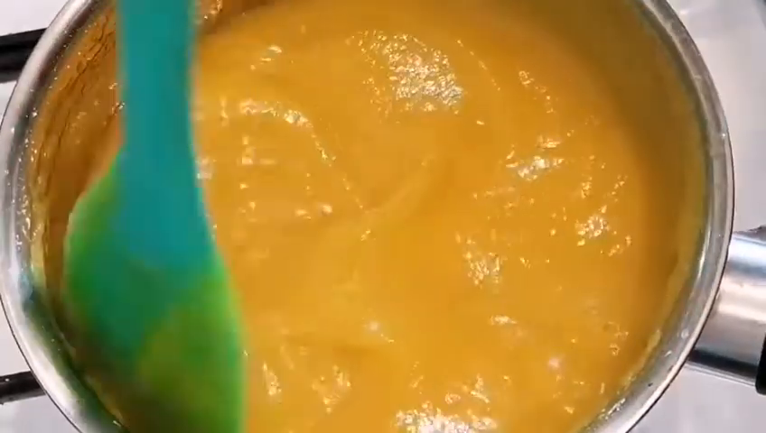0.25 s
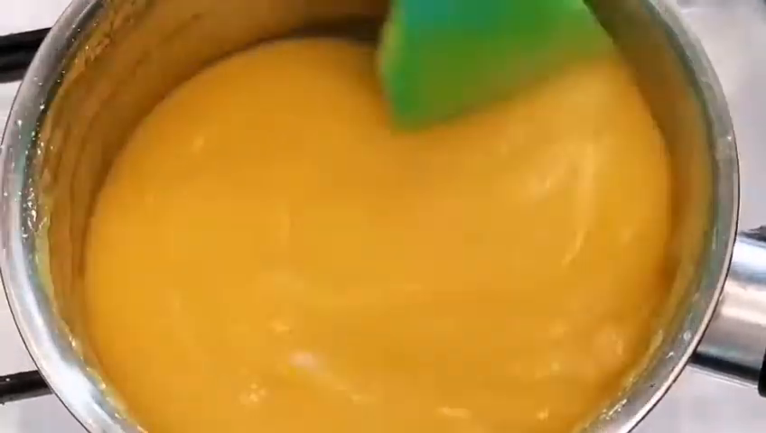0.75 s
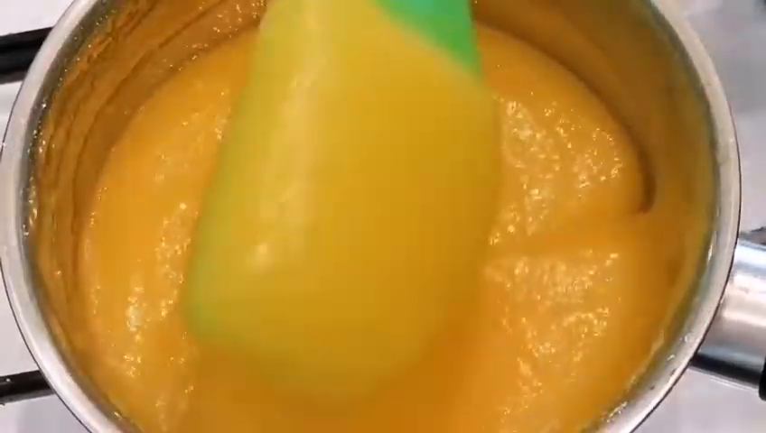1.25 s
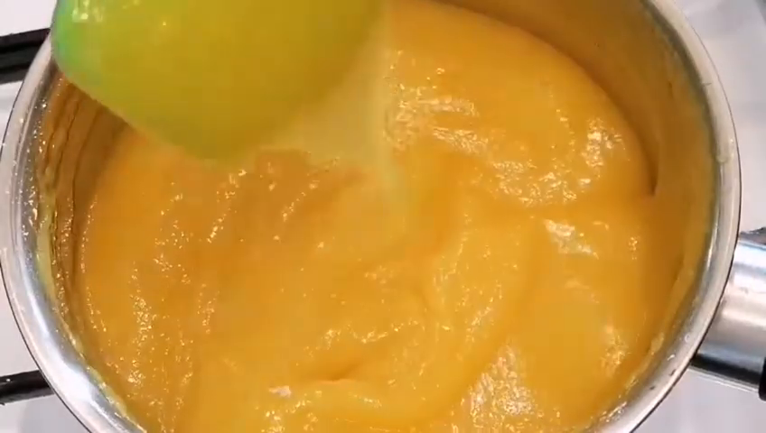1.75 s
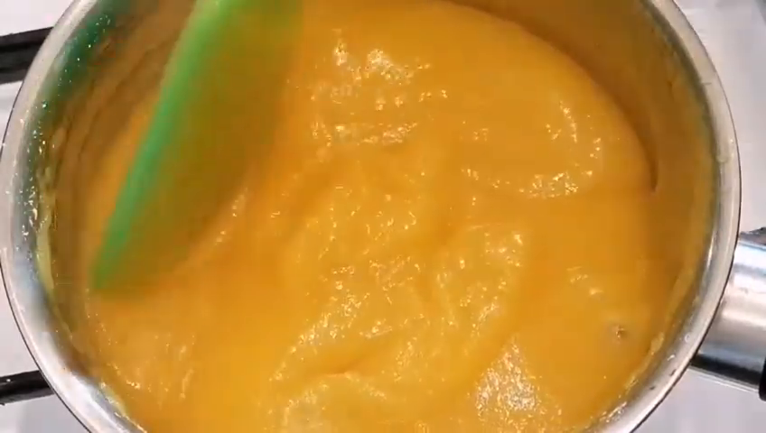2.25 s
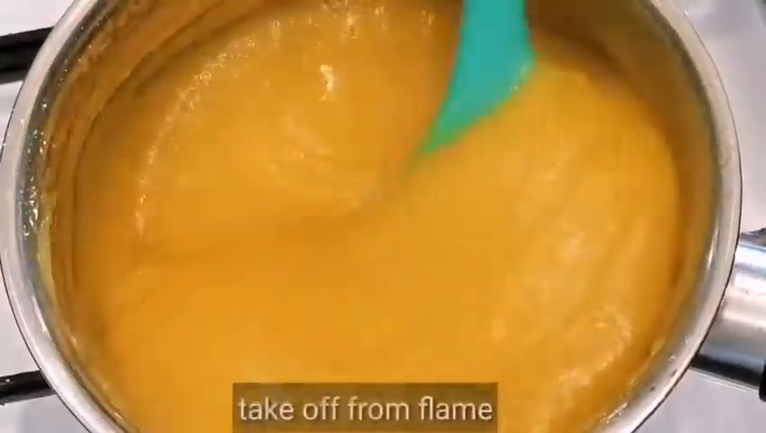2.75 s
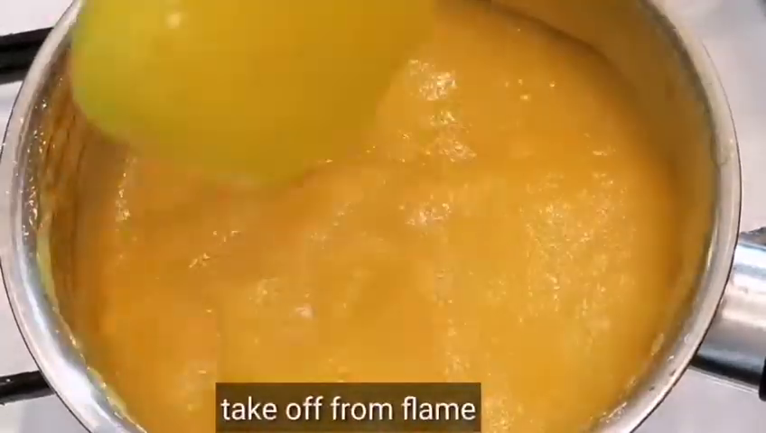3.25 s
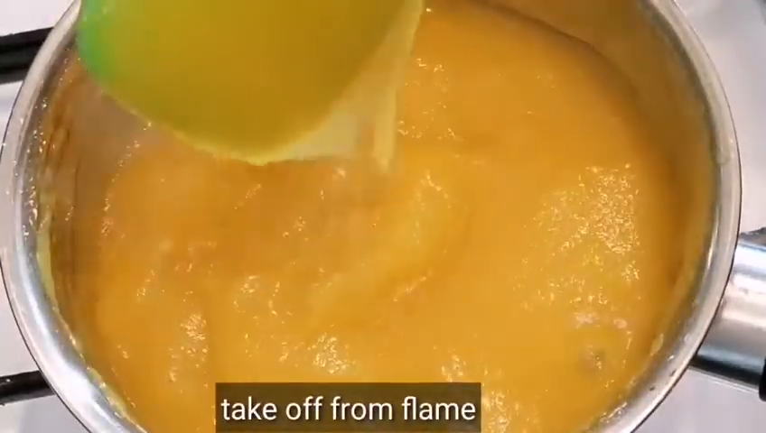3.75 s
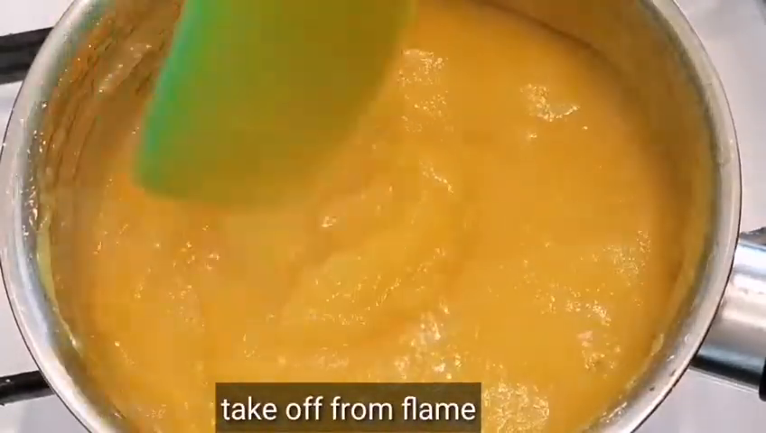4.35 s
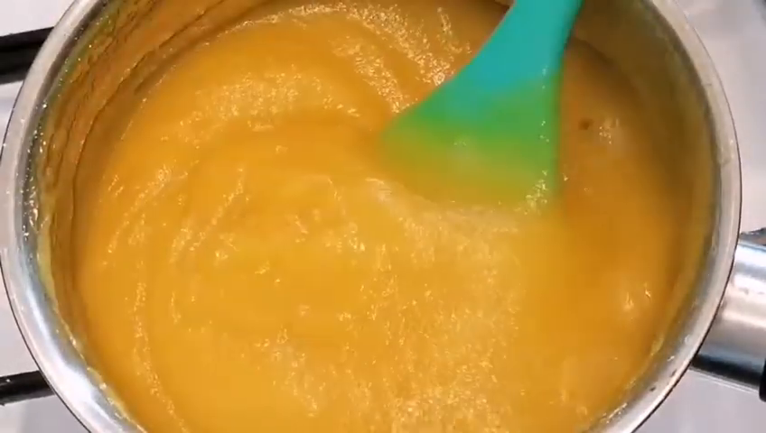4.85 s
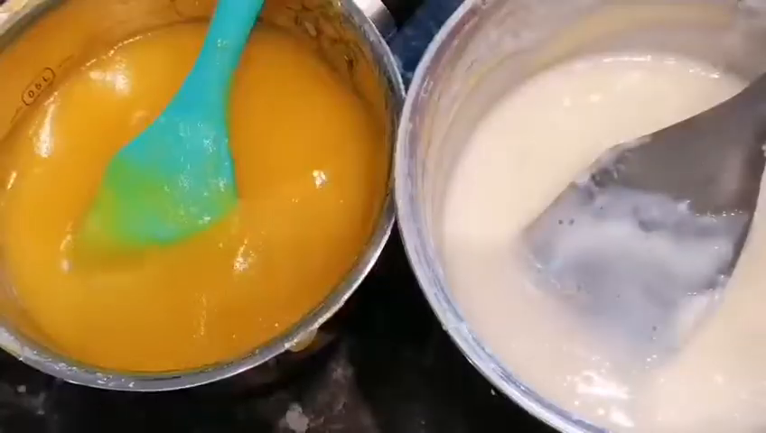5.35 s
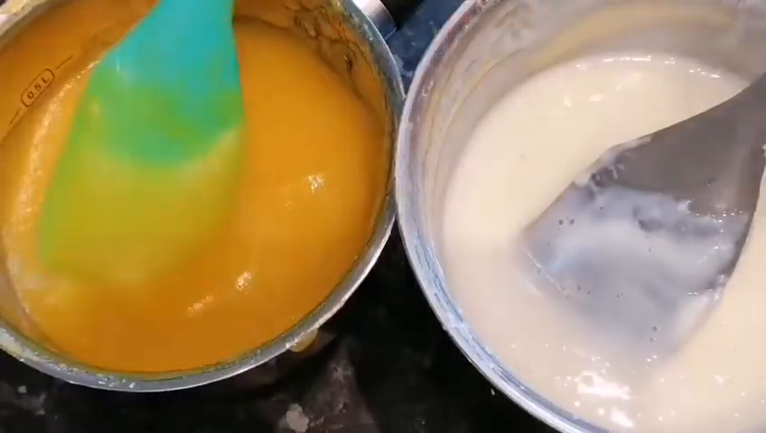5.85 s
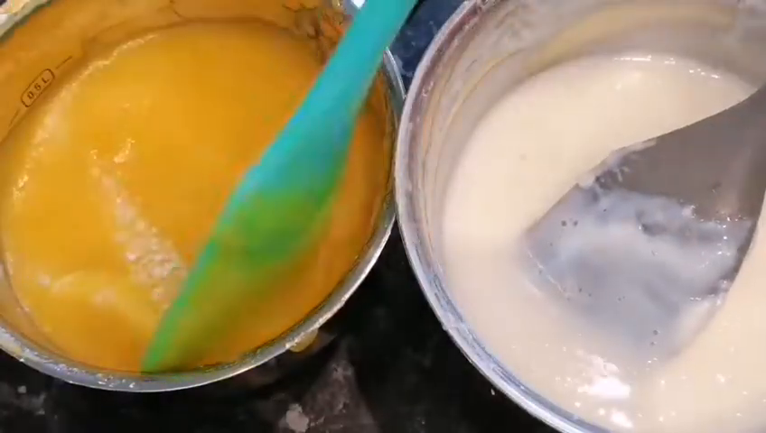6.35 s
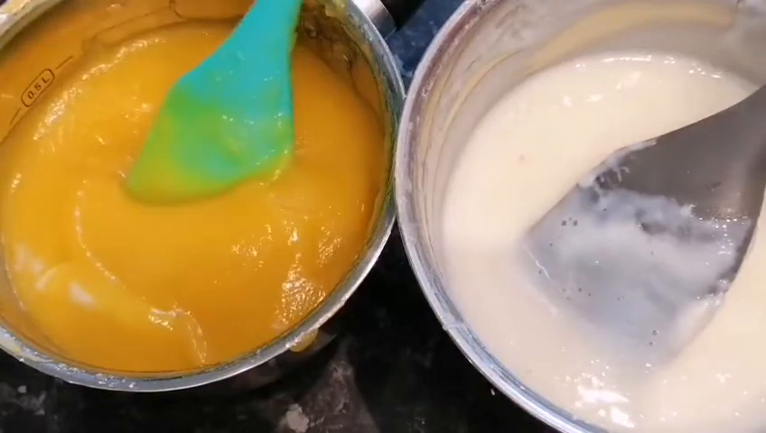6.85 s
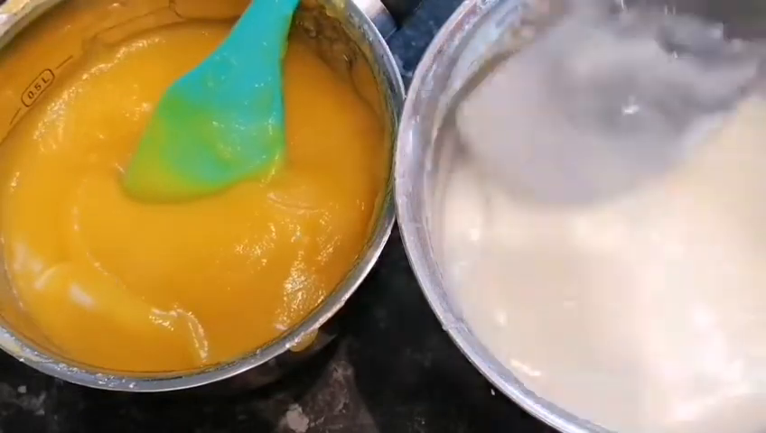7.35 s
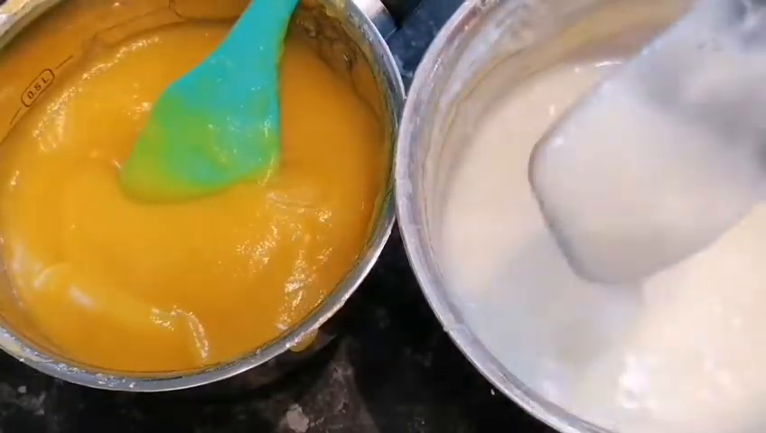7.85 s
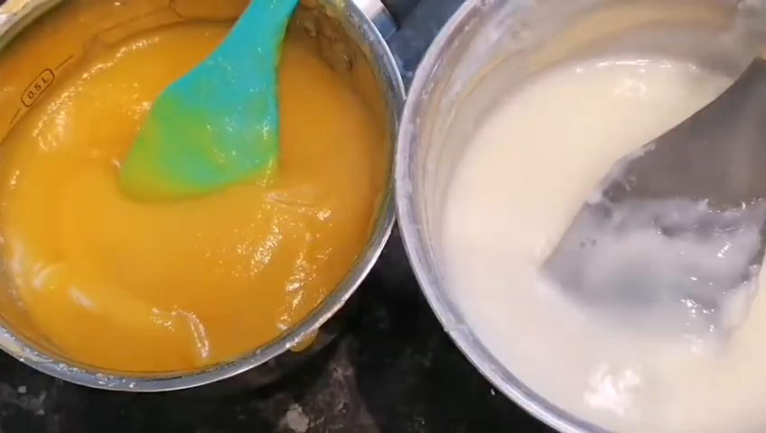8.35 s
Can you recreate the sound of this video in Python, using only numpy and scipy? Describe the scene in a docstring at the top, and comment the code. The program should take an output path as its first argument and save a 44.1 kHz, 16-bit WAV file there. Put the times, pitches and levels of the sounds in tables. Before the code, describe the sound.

Outdoors among trees, birds sing over a faint hiss, a soft distant roar that swells and sinks, low rumble and barely audible hum. It starts mid-call: two sharp downward whips with upturned ends by 0.2 s, four low rising dips from 0.3 to 0.65, a high flick at 0.7. From 1.1 to 2.25 a thinner voice whistles seven sliding notes amid echoing twitter. Quick chips run from 2.3 to 2.9, then a clear short rising whistle. From 3 to 4.9 only sparse faint buzzes, peeps and chatter remain. Ticks and upward slurs return around 5, trills thicken near 6, and rapid ticks from 6.45 lead into six bright rolling phrases, 7 to 7.9. Thin whistles overlap from 7.2 to 8.45; a quick rising ladder at 8 and a falling swish close at 8.2-8.45. Sound favours the left; the right is later and shaded.

```python
"""A leafy place with songbirds: one whips and dips, one whistles thin sliding notes, one speeds up from chips
into rolling phrases. Each voice is a nearly pure tone gliding along a pitch contour, with scattered echoes.
Farther birds twitter in the echo, and a few faint low gliding tones pass. Filtered noise makes a hush that
rises and sinks, over a low rumble with a faint mains hum. The sound arrives from the left: the right channel
is later and shaded."""
import sys
import numpy as np
from scipy import signal
from scipy.fft import rfft, irfft
from scipy.io import wavfile
from scipy.ndimage import uniform_filter1d

SR = 44100
rng = np.random.default_rng(int(sys.argv[2]) if len(sys.argv) > 2 else 0)


def digitize_waveform(pressure):
    """Quantize a signal to 16-bit integers and store it at the path in sys.argv[1].

    Rows of a 2-D input are taken as channels; values are limited to [-1, 1].
    """
    field = np.atleast_2d(pressure).T
    bounded = np.clip(field, -1, 1)
    quanta = np.round(bounded * 32767).astype(np.int16)
    wavfile.write(sys.argv[1], SR, quanta)


N = 379689  # length [samples]


def gain_of(db):
    """Decibel law: 20 dB is a factor of ten in amplitude."""
    return 10 ** (np.asarray(db) / 20)


def evened(x):
    """Normalization: scales a signal to rms 1."""
    return x / np.sqrt(np.mean(x ** 2) + 1e-20)


def coloured(x, points):
    """Spectral shaping: multiplies the spectrum by a (frequency [Hz], level [dB]) curve over log frequency."""
    hz, db = np.transpose(points)
    bins = np.fft.rfftfreq(2 * N, 1 / SR)
    response = gain_of(np.interp(np.log(bins + 1), np.log(hz), db))
    return irfft(rfft(x, 2 * N) * response)[:N]


def add(mix, s, sound):
    """Superposition: adds a sound at time s, cut to the length of the mix."""
    start = round(s * SR)
    sound = sound[max(-start, 0):]
    part = mix[max(start, 0):][:len(sound)]
    part += sound[:len(part)]


def waver(count, size):
    """Low-passed noise: a random drift of rms 1, twice averaged over size samples."""
    noise = rng.standard_normal(count + 8 * size)
    smooth = uniform_filter1d(uniform_filter1d(noise, size), size)
    return evened(smooth)[:count]


def syrinx(hz, level, jitter=0.0054, *, shimmer_db):
    """Phase integration: a nearly pure tone whose pitch and strength tremble at random."""
    trembling_hz = hz * (1 + jitter * waver(len(hz), size=90))
    phase = 2 * np.pi * np.cumsum(trembling_hz) / SR
    second_harmonic = gain_of(-53) * np.sin(2 * phase) * (2 * hz < 11000)
    shimmer = gain_of(shimmer_db * waver(len(hz), size=160))
    return np.sqrt(2) * level * shimmer * (np.sin(phase) + second_harmonic)


def note(rows, pitch=1, effort_db=0, edge_s=.0025):
    """Frequency and amplitude modulation: a note glides along its contour and fades at both ends."""
    s, hz, db = np.transpose(rows)
    s = np.sort(s)
    t = np.arange(s[0] - edge_s, s[-1] + edge_s, 1 / SR)
    glide = uniform_filter1d(np.interp(t, s, hz), size=110)
    to_nearest_end = np.minimum(t - t[0], t[-1] - t)
    fade = np.sin(np.pi / 2 * np.clip(to_nearest_end / (2 * edge_s), 0, 1))
    level = gain_of(np.interp(t, s, db) + effort_db) * fade
    return t[0], syrinx(pitch * glide, level, shimmer_db=1.2)


def chip(length, start_hz, end_hz, db, jitter, buzz=0, buzz_hz=0):
    """Linear sweep under a tapered window; a fast wobble of the pitch makes it buzz."""
    u = np.linspace(-.15, 1.15, int(1.3 * length * SR))  # overruns each end by 15 % of the length
    swell = signal.windows.tukey(len(u), .8)
    wobble = 1 + buzz * np.sin(2 * np.pi * (buzz_hz * length * u + rng.random()))
    hz = (start_hz + (end_hz - start_hz) * u) * wobble
    return syrinx(hz, gain_of(db) * swell, jitter, shimmer_db=1.8)


def chips(rows, jitter):
    """Superposition of single sweeps, plain or buzzy, from a table."""
    out = np.zeros(N)
    for s, length, start_hz, end_hz, db, *buzz in rows:
        add(out, s - .15 * length, chip(length, start_hz, end_hz, db, jitter, *buzz))
    return out


# syllable contours, before a bout's pitch factor and effort: (time [s], pitch [Hz], level [dB])
WHIP = [(0, 10000, -60), (.0015, 7000, -36), (.003, 5800, -21), (.006, 4550, -8), (.012, 3250, -15),
        (.022, 2600, -18), (.04, 2530, -19), (.06, 2780, -15), (.075, 3080, -7.5), (.089, 3350, -18)]
DIP = [(0, 1780, -22), (.004, 1430, -22), (.02, 1130, -24), (.029, 1430, -25), (.034, 1850, -14.5),
       (.046, 2280, -12), (.056, 2240, -15)]
FLICK = [(0, 2900, -34), (.004, 3700, -22), (.007, 4800, -8), (.011, 6700, -19), (.017, 6650, -14),
         (.032, 6050, -19)]
# three notes in one: a high pip, a slur that turns up, and a hook that lifts and then plunges
ROLL = [(0, 4350, -24), (.004, 4660, -10), (.01, 4760, -10), (.017, 4680, -40), (.022, 4480, -18),
        (.028, 4100, -14), (.038, 3400, -18), (.045, 3170, -18), (.051, 3300, -18.5), (.057, 3720, -21),
        (.064, 3300, -50), (.072, 3170, -21), (.082, 3550, -16.5), (.088, 3230, -20), (.094, 2750, -24),
        (.099, 2300, -36), (.105, 1750, -56)]
RISE = [(0, 2550, -46), (.017, 3150, -30), (.03, 3750, -42), (.038, 4100, -38), (.043, 4330, -18),
        (.049, 4600, -15), (.056, 4900, -28), (.064, 5150, -40)]
LIFT = [(0, 4330, -25), (.016, 4480, -13), (.038, 4700, -9), (.055, 4970, -20)]
TICK = [(0, 5250, -25), (.005, 4900, -13), (.009, 4450, -19), (.012, 4050, -14), (.015, 3550, -31)]
HOOK = [(0, 2450, -45), (.006, 2750, -34), (.011, 3200, -29), (.015, 3600, -41)]
SWOOP = [(0, 4250, -39), (.02, 3980, -28), (.035, 3620, -36), (.045, 3780, -29), (.056, 4250, -25),
         (.064, 4550, -38)]
WIGGLE = [(0, 4900, -33), (.006, 3800, -26), (.011, 4400, -28), (.018, 3400, -28), (.029, 4200, -24),
          (.034, 3650, -25), (.038, 4200, -27), (.045, 2950, -34)]
ASCENT = [(0, 2000, -45), (.012, 2150, -39), (.022, 2600, -42), (.068, 4050, -36), (.08, 4150, -45)]
BOW = [(0, 2700, -40), (.003, 3600, -33), (.007, 4250, -39), (.025, 4400, -42), (.037, 4100, -35),
       (.046, 3550, -28), (.05, 2700, -37)]
SWEEP = [(0, 2750, -42), (.005, 3350, -31), (.011, 4100, -32), (.017, 4350, -19), (.022, 4700, -34)]
# bouts of one syllable: (part of the chorus, syllable, start times [s], first pitch factor, last pitch factor,
# first effort [dB], last effort [dB]); the part labelled "far" is single winding notes among the nearby chips
SUNG = [("opening", WHIP, [-.063, .136], 1, 1, 0, 0), ("opening", DIP, [.293, .4, .507, .612],
        .975, 1, -1.5, 1.5), ("opening", FLICK, [.715], 1, 1, 0, 0), ("far", SWOOP, [.962, 1.823],
        1, 1, -4, 0), ("far", WIGGLE, [1.42], 1, 1, -1.5, -1.5), ("whistler", LIFT, [2.901], 1, 1, -1, -1),
        ("far", ASCENT, [3.303], 1, 1, 0, 0), ("far", BOW, [3.443], 1, 1, 0, 0),
        ("prelude", TICK, [4.922, 5.272], 1, .98, -15, -3.5), ("prelude", HOOK, [5.043, 5.35, 5.686],
        1, 1, -3, -1), ("prelude", SWEEP, [5.402, 5.738], 1, 1, 1, 1), ("prelude", RISE, [5.482, 5.822],
        1, .99, 0, 1.5), ("prelude", HOOK, [6.003, 6.115, 6.224, 6.338, 6.45, 6.562], 1, 1, -1, -4),
        ("ticks", TICK, [6.45, 6.516, 6.58, 6.643, 6.708, 6.77, 6.834, 6.898], .96, 1, -3, 1.5),
        ("rolls", ROLL, [6.974, 7.136, 7.295, 7.456, 7.623, 7.797], 1.015, .975, -1.5, -2)]


def syllables(part, delay_s=0):
    """Repetition with linear drift: pitch and effort change evenly through each bout of one part."""
    out = np.zeros(N)
    for name, shape, starts, first_pitch, last_pitch, first_db, last_db in SUNG:
        if name == part:
            drift = np.linspace([first_pitch, first_db], [last_pitch, last_db], len(starts))
            for s, (pitch, effort_db) in zip(starts, drift):
                lead, sound = note(shape, pitch, effort_db)
                add(out, s + lead + delay_s, sound)
    return out


LEAD_IN_S = .1  # sung before time zero and cut away
# directivity: what the opening singer throws at the trees against the microphones: (frequency [Hz], level [dB])
THROWN = [(1200, -4.5), (2200, -1.5), (2550, 1), (3200, 5.5), (3900, 5.5), (5000, 7.5), (6200, -1.5),
          (7200, 3), (8500, -8.5)]


def opening():
    """Reverberation from before time zero: the first singer is in mid-note, its echo already ringing."""
    song = syllables("opening", LEAD_IN_S)
    thrown = coloured(song, THROWN)
    song = song + trees(thrown, close_db=-24, echo_db=-8.5, t60=.56, late_db=-21, late_t60=1.7)
    lead = round(LEAD_IN_S * SR)
    return np.pad(song[lead:], (0, lead))


SCOOP_S, SWELL_S, RELEASE_S, BREAK_S = .008, .011, .0074, .008  # time constants [s]
SOFT_START_DB, SOFT_END_DB = -10.5, -7.5
WARBLES_PER_S = 38
STRONGEST_HZ, WEAKER_DB_PER_KHZ = 4670, 5


def whistle(length, scoop_hz, start_hz, turn, turn_hz, end_hz, warble_hz, break_db):
    """Piecewise glide through a resonance: scoop, slide to a turn, then move on, loudest near one pitch."""
    t = np.linspace(0, length, num=64)
    turn_s = np.clip(turn, 0, 1) * length
    hz = np.interp(t, [0, turn_s, length], [start_hz, turn_hz, end_hz])
    hz += scoop_hz * np.exp(-t / SCOOP_S)
    hz += warble_hz * np.sin(np.pi * WARBLES_PER_S * np.maximum(t - turn_s, 0)) ** 2
    off_khz = abs(hz - STRONGEST_HZ) / 1000
    ends_db = SOFT_START_DB * np.exp(-t / SWELL_S) + SOFT_END_DB * np.exp((t - length) / RELEASE_S)
    turn_db = break_db * np.exp(-((t - turn_s) / BREAK_S) ** 2)
    return np.transpose([t, hz, ends_db + turn_db - WEAKER_DB_PER_KHZ * off_khz])


# contours of the whistled phrase, before the pitch factor: (scoop [Hz], start [Hz], turn [share of length],
# turn pitch [Hz], end [Hz], warble depth [Hz], break in the voice at the turn [dB])
WHISTLE_NOTES = [(1300, 5250, .5, 5260, 5430, 0, 0), (1300, 5980, .85, 5750, 5700, 0, 0),
                 (1500, 4900, .32, 4930, 5450, 0, 0), (-1100, 6600, .6, 4830, 5200, 0, 0),
                 (1300, 6050, .31, 5740, 6100, 650, 0), (-1650, 7900, .9, 5520, 5450, 0, 0),
                 (0, 6200, .68, 4350, 5100, 0, -11)]
# each singing of the phrase, note by note: (time [s], length [s], pitch factor, effort [dB])
PHRASES = [
    [(1.135, .095, 1, -22), (1.382, .088, 1.015, -14.5), (1.517, .103, 1, -14.5), (1.652, .098, 1, -12.5),
     (1.787, .122, 1, -15.5), (1.972, .066, 1, -15), (2.088, .16, 1, -13.5)],
    [(7.229, .125, 1, -19), (7.53, .1, .99, -15.5), (7.688, .108, 1.015, -17), (7.832, .1, 1.015, -16),
     (7.98, .122, 1, -16.5), (8.163, .06, 1, -17), (8.29, .155, 1.02, -18.5)],
]


def whistler():
    """Transposition and stretching: one phrase of thin sliding notes is sung twice."""
    out = np.zeros(N)
    for phrase in PHRASES:
        for (s, length, pitch, effort_db), shape in zip(phrase, WHISTLE_NOTES):
            lead, sound = note(whistle(length, *shape), pitch, effort_db)
            add(out, s + lead, sound)
    return out


# evenly spaced nearby chips: (first time [s], last time [s], count, length [s], start [Hz], end [Hz],
# first level [dB], last level [dB])
TRILLS = [(2.264, 2.892, 6, .016, 4600, 3500, -27, -25.5), (3.022, 3.232, 4, .015, 2450, 1900, -42, -38),
          (5.947, 6.402, 5, .004, 4100, 5100, -36, -26), (5.962, 6.414, 5, .004, 4400, 5500, -32, -26),
          (5.972, 6.425, 5, .003, 5300, 6100, -35, -28), (5.986, 6.328, 4, .003, 5600, 6200, -36, -31),
          (6.1, 6.356, 3, .016, 5300, 4900, -32, -23), (6.251, 6.38, 2, .007, 6100, 5500, -28, -27)]


def trills():
    """Periodic repetition: each trill repeats one chip at an even pace while its level changes steadily."""
    rows = []
    for first_s, last_s, count, length, start_hz, end_hz, first_db, last_db in TRILLS:
        for s, db in np.linspace([first_s, first_db], [last_s, last_db], round(count)):
            rows.append((s, length, start_hz, end_hz, db))
    return rows


LADDER_S, LADDER_STEP_S = 7.99, .0165  # start and spacing [s]
LADDER_HZ, LADDER_RATIO, LADDER_SAG = 2550, 1.2, .05  # lowest middle pitch, step ratio, sag either way
LADDER_FIRST_DB, LADDER_LAST_DB = -33, -21


def ladder(count=5):
    """Geometric pitch series: a quick run of short sagging notes, each a step higher and louder."""
    times = LADDER_S + LADDER_STEP_S * np.arange(count)
    pitches = LADDER_HZ * LADDER_RATIO ** np.arange(count)
    levels = np.linspace(LADDER_FIRST_DB, LADDER_LAST_DB, count)
    return [(s, LADDER_STEP_S, hz * (1 + LADDER_SAG), hz * (1 - LADDER_SAG), db)
            for s, hz, db in zip(times, pitches, levels)]


STROKES_PER_S, STROKE_S, STROKE_SLIP_S = 165, .0042, .0012  # rate, length [s], largest timing slip [s]
STROKE_SPREAD, STROKE_SPREAD_DB = .05, 4  # largest random share of pitch, and change of level
# range of the closing swish, before the random spread: (time [s], top [Hz], bottom [Hz], level [dB])
SWISH = [(8.218, 5380, 4500, -18), (8.262, 5000, 4010, -12), (8.305, 4600, 3500, -21),
         (8.359, 3830, 2615, -29), (8.44, 3490, 2170, -32.5)]


def swish():
    """Temporal fusion: tiny down-strokes too fast to count, in a range that sinks and widens."""
    s, *curves = np.transpose(SWISH)
    times = np.arange(s[0], s[-1], 1 / STROKES_PER_S)
    top_hz, bottom_hz, db = (np.interp(times, s, curve) for curve in curves)
    late, sharp, strong = rng.uniform(-1, 1, (len(times), 3)).T
    pitch = 1 + STROKE_SPREAD * sharp
    starts = times + STROKE_SLIP_S * late
    lengths = np.full(len(times), STROKE_S)
    levels = db + STROKE_SPREAD_DB * strong
    return list(zip(starts, lengths, top_hz * pitch, bottom_hz * pitch, levels))


# single nearby chips: (time [s], length [s], start [Hz], end [Hz], level [dB])
CHIPS = [(1.892, .008, 3500, 3100, -33), (1.992, .025, 4000, 3774, -31), (2.281, .005, 4500, 3400, -25),
         (2.299, .004, 4200, 3000, -28), (2.452, .005, 4500, 3000, -30), (2.628, .02, 4600, 5050, -27),
         (2.718, .009, 2800, 3300, -29), (3.506, .007, 3000, 4000, -32), (3.502, .015, 4300, 4750, -28),
         (3.53, .037, 2450, 1820, -43), (6.62, .02, 3150, 3000, -38), (6.898, .014, 3200, 2700, -33),
         (8.064, .013, 4200, 4450, -25), (8.2, .04, 2900, 2200, -42)]


def near_chips():
    """Transient sweeps: the trills, the ladder, the swish and single chips, all nearby."""
    return chips(trills() + ladder() + swish() + CHIPS, jitter=.007)


# buzzy notes of farther birds: (time [s], length [s], start [Hz], end [Hz], level [dB],
# wobble [share of pitch], wobble rate [Hz])
FAR_CHIPS = [(.565, .029, 4060, 3740, -36, .08, 135), (3.41, .034, 3450, 3450, -35, .03, 70),
             (3.738, .055, 4120, 3980, -33, .035, 120), (4.268, .015, 3200, 2900, -46, .04, 150),
             (4.375, .02, 3050, 3150, -46, .08, 150), (4.735, .025, 2950, 3100, -49, .05, 150),
             (4.995, .055, 4300, 4620, -38, .04, 150)]
# thin level peeps: (time [s], length [s], start [Hz], end [Hz], level [dB])
PEEPS = [(2.795, 0.091, 5710, 5760, -50.5), (3.192, 0.035, 5550, 5490, -35.5),
         (3.568, 0.027, 6400, 6130, -49), (4.775, 0.045, 7440, 7170, -60), (4.792, 0.043, 6500, 6280, -47),
         (5.12, .055, 7520, 7500, -58), (5.135, 0.021, 6030, 5650, -42.5), (5.62, 0.043, 5990, 5790, -49.5)]


def far_chips():
    """Frequency modulation: fast wobbles make the far notes buzz, beside thin plain peeps."""
    return chips(FAR_CHIPS, jitter=.012) + chips(PEEPS, jitter=.005)


# twittering bouts that swell or fade: (start [s], end [s], lowest [Hz], highest [Hz],
# first level [dB], last level [dB])
TWITTER = [(.87, 1.13, 3220, 5080, -45, -37), (1.14, 1.237, 2870, 5130, -29, -32.5),
           (1.381, 1.473, 4160, 5350, -33.5, -28), (1.65, 2.05, 3000, 5370, -32.5, -35.5),
           (2.2, 2.9, 2887, 5180, -31.5, -32), (2.3, 3.953, 2603, 3316, -37.5, -46.5),
           (3.251, 3.702, 2324, 4950, -39, -39.5), (4.269, 4.75, 3300, 5770, -51, -51.5),
           (5.935, 6.43, 3900, 5900, -43, -32), (6.621, 6.94, 2723, 4676, -42, -33),
           (8.01, 8.45, 2830, 6170, -20.5, -29.5)]


def twitter(per_s=80, length=.006):
    """Granular texture: distant birds fill each bout with quick sweeps up and down their range."""
    out = np.zeros(N)
    for first_s, last_s, low_hz, high_hz, first_db, last_db in TWITTER:
        slots = np.arange(first_s, last_s, 1 / per_s)
        levels = np.linspace(first_db, last_db, len(slots))
        draws = rng.random((len(slots), 4))
        for s, db, (late, a, b, strength) in zip(slots, levels, draws):
            shares = np.array([a, (a + (1 + b) / 3) % 1])  # the end lies a third to two thirds on, wrapped
            start_hz, end_hz = low_hz + (high_hz - low_hz) * shares
            sweep = chip(length, start_hz, end_hz, db + 10 * (strength - .5), jitter=.008)
            add(out, s + (late - .5) / per_s, sweep)
    return out


# faint low gliding tones: (time [s], length [s], start [Hz], end [Hz], level [dB])
LOW_TONES = [(.025, 0.12, 163, 242, -39.5), (3.655, 0.14, 228.5, 255, -46.5), (5.87, 0.099, 222, 172, -51),
             (6.16, 0.16, 201.5, 139.6, -49.5)]


def low_tones():
    """Low-frequency glides: faint tones swell and fade as their pitch slides."""
    return chips(LOW_TONES, jitter=.01)


SLAP_S, SLAP_DB = .0115, -9  # delay [s] and strength of the single reflection


def slap(x):
    """Specular reflection: one hard surface close by returns each note once."""
    return gain_of(SLAP_DB) * np.pad(x, (round(SLAP_S * SR), 0))[:N]


def trees(x, close_db, echo_db, t60, late_db, late_t60):
    """Scattering: close surfaces smear, leaves and trunks echo quickly, the surroundings long and faintly."""
    t = np.arange(SR) / SR
    # sparse reflections of random sign, about 3000 per second
    taps = rng.choice([-1., 1.], SR) * (rng.random(SR) < 3000 / SR) * (t > .004)
    close = np.roll(taps, 100) * (t < .018) * (t > .004)
    early = taps * gain_of(-60 * t / t60)
    late = taps[::-1] * gain_of(-60 * t / late_t60) * (1 - np.exp(-t / .1))
    tail = np.zeros(SR)
    for db, part in [(close_db, close), (echo_db, early), (late_db, late)]:
        tail += gain_of(db) * part / np.linalg.norm(part)
    return signal.fftconvolve(x, tail)[:N]


# spectrum of the distant roar: (frequency [Hz], relative density [dB per Hz])
HUSH = [(130, -26), (270, -31), (315, -17), (360, -20), (430, -8), (650, 0), (900, -5), (1400, -16.5),
        (2500, -25.5), (9000, -41), (12000, -67)]
# rise and fall of the roar, before a small random drift: (time [s], level [dB])
HUSH_DB = [(.2, -50.5), (0.547, -44), (1.201, -41), (2.1, -45.5), (2.55, -41.5), (3, -43.5), (4.8, -42.5),
           (6.3, -42.5), (6.801, -48), (8.6, -45.5)]
# spectrum of the thin hiss: (frequency [Hz], relative density [dB per Hz])
AIR = [(200, -13), (1500, 5.5), (3500, -3), (4600, -1), (6500, -6), (8000, -8), (9600, -15), (11000, -17.5),
       (11600, -38.5), (15000, -37)]


def hush(air_db=-54):
    """Filtered noise: a distant roar that rises and sinks, under a steady thin hiss."""
    s, db = np.transpose(HUSH_DB)
    drift_db = .5 * waver(N, size=4000)
    roar_level = gain_of(np.interp(np.arange(N) / SR, s, db) + drift_db)
    roar = roar_level * evened(coloured(rng.standard_normal(N), HUSH))
    hiss = gain_of(air_db) * evened(coloured(rng.standard_normal(N), AIR))
    return roar + hiss


# spectrum of the rumble: (frequency [Hz], relative density [dB per Hz])
RUMBLE = [(20, 2.5), (35, -9), (56, 9.5), (80, -13), (105, 0), (130, -14.5), (280, -18.5), (450, -39),
          (3000, -70)]


def rumble(db):
    """Filtered noise: a low rumble at a steady level."""
    return gain_of(db) * evened(coloured(rng.standard_normal(N), RUMBLE))


# mains hum lines: (frequency [Hz], rms level [dB])
HUM = [(50, -68.5), (100, -60)]


def hum(rumble_db=-57):
    """Harmonic lines: steady mains hum in a low rumble."""
    t = np.arange(N) / SR
    out = rumble(rumble_db)
    for hz, db in HUM:
        out += np.sqrt(2) * gain_of(db) * np.sin(2 * np.pi * (hz * t + rng.random()))
    return out


RIGHT_LAG_S = .000317
# shading of the right channel: (frequency [Hz], level [dB])
SHADE = [(250, 0), (420, -13), (800, -13), (1250, -6), (1800, -14), (2330, -8), (2550, 0), (3250, -4),
         (3650, -11), (4250, -16), (4950, -12), (5350, -3.5), (5900, -6), (6500, -18), (9500, -15)]


def right_channel(left, scatter):
    """Interchannel delay and shading: the left sound comes later, joins the scatter and is filtered."""
    lag = round(RIGHT_LAG_S * SR)
    return coloured(np.pad(left, (lag, 0))[:N] + scatter, SHADE)


def scene():
    """Direct-to-reverberant balance: each singer has its own share of echo, at two spaced microphones."""
    prelude, ticks, rolls, winding = map(syllables, ["prelude", "ticks", "rolls", "far"])
    whistles = whistler() + syllables("whistler")
    chipping = near_chips() + winding
    far = far_chips()
    chatter = twitter()
    birds = opening()
    birds += prelude + trees(prelude, close_db=-8, echo_db=-5.5, t60=.33, late_db=-17, late_t60=1.5)
    birds += ticks + slap(ticks)
    birds += trees(ticks, close_db=-15, echo_db=-4, t60=.45, late_db=-15, late_t60=1.7)
    birds += rolls + trees(rolls, close_db=-13, echo_db=-3.5, t60=.5, late_db=-15, late_t60=1.7)
    birds += whistles + trees(whistles, close_db=-21.5, echo_db=-7.5, t60=.52, late_db=-21.5, late_t60=1.3)
    birds += chipping + trees(chipping, close_db=-9, echo_db=-3.5, t60=.45, late_db=-15, late_t60=1.7)
    # the twittering is heard mostly through its echo
    birds += gain_of(-0.5) * far + gain_of(-9) * chatter
    birds += trees(far + chatter, close_db=-6, echo_db=-2.5, t60=.38, late_db=-14, late_t60=2.0)
    left = birds + low_tones() + hush() + hum()
    # the right microphone also catches scatter, hush and rumble of its own
    scatter = trees(birds, close_db=-22, echo_db=-12, t60=.45, late_db=-26, late_t60=1.3)
    scatter += gain_of(-9) * hush() + rumble(-60)
    return np.array([left, right_channel(left, scatter)])


EDGE_HZ = 15100


def record(dry):
    """Band limiting: a symmetric low-pass filter sets the upper edge of the recorder."""
    lowpass = signal.firwin(511, EDGE_HZ, window=("kaiser", 9), fs=SR)
    return signal.oaconvolve(dry, lowpass[None], "same")


dry = scene()
out = record(dry)
digitize_waveform(out)
```